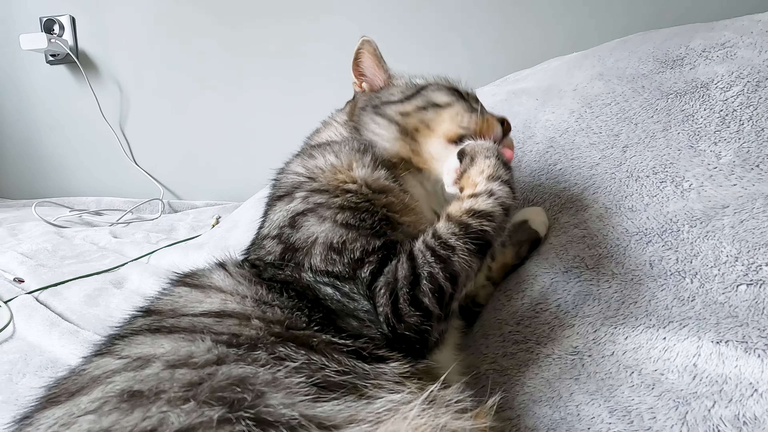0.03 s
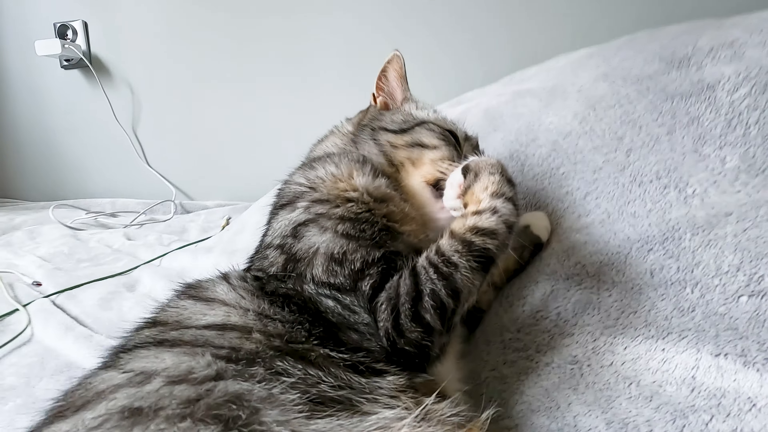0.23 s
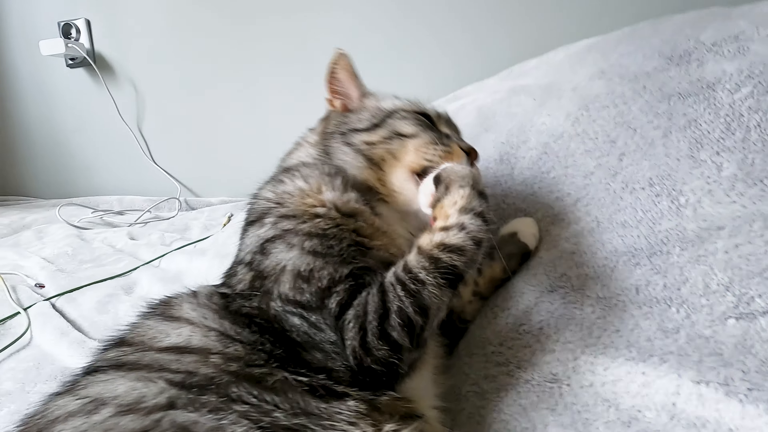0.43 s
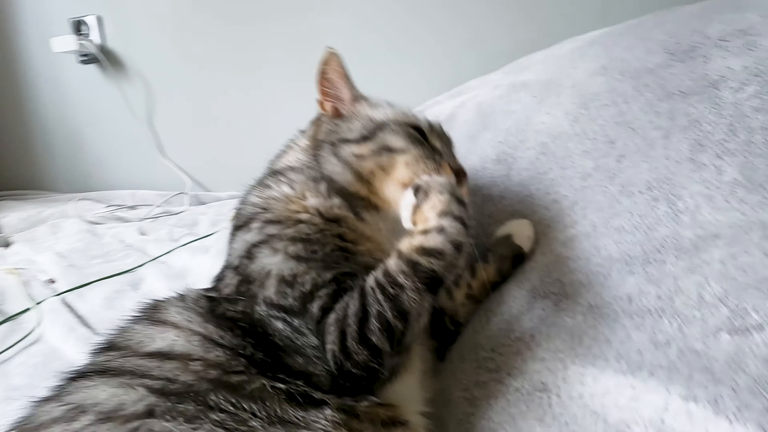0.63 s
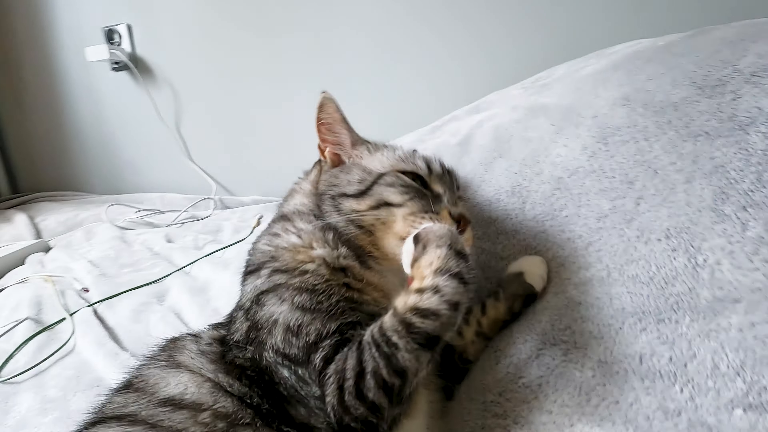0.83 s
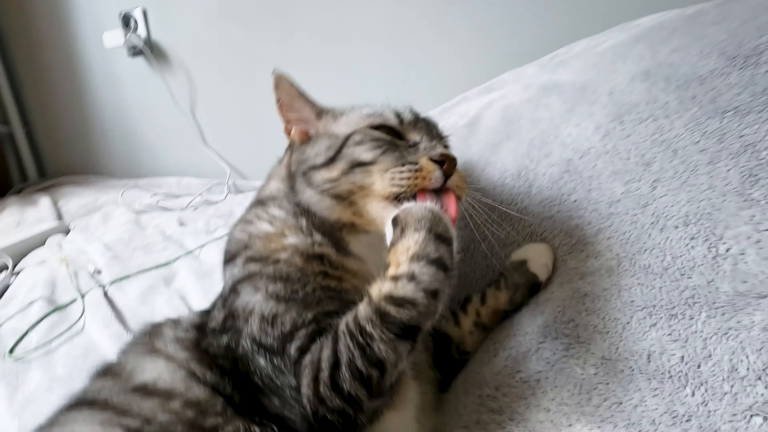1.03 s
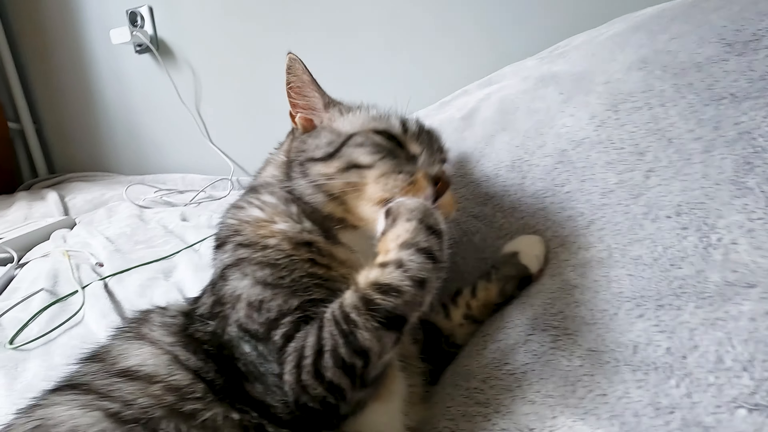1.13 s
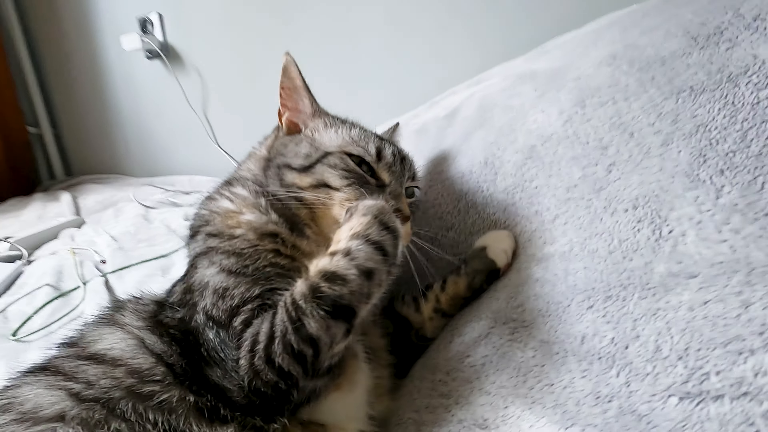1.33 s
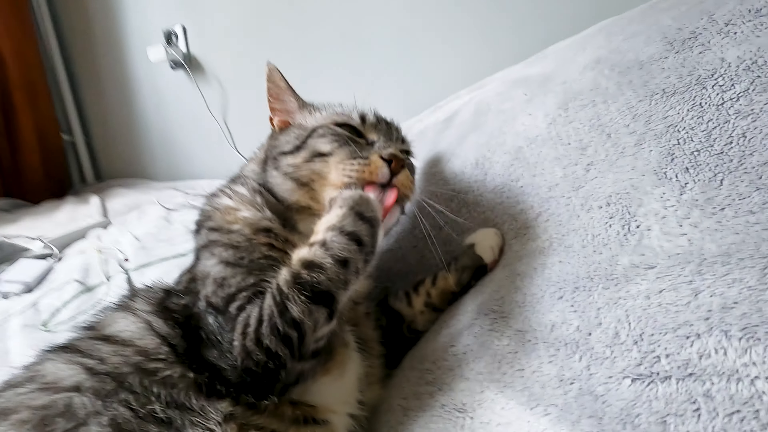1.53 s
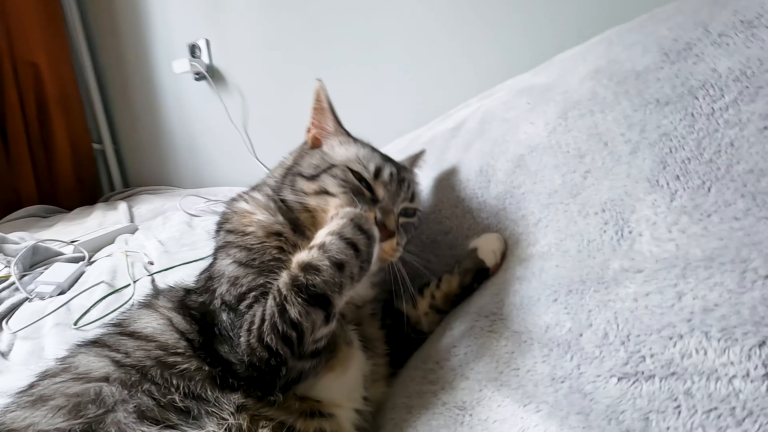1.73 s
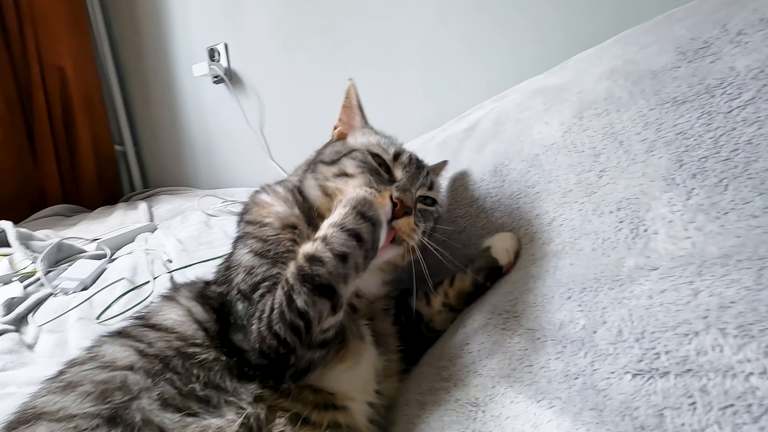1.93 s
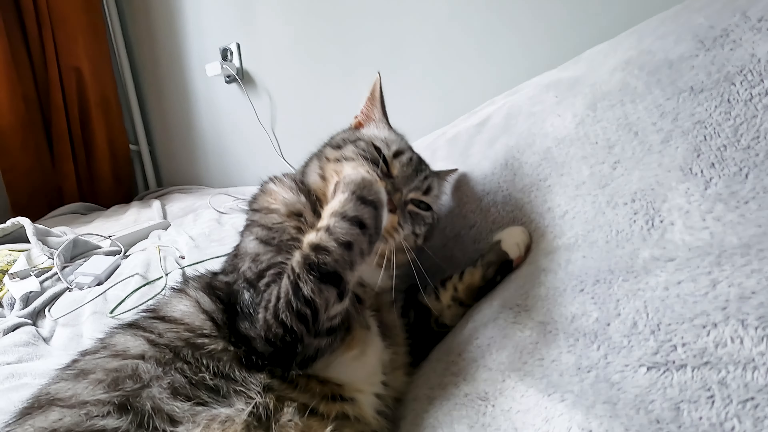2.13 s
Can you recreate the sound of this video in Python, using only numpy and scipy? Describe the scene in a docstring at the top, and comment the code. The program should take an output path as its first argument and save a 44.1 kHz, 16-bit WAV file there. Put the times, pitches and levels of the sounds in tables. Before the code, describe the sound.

A cat licks its paw with soft raspy strokes and small wet smacks.

```python
"""A cat licks its paw and wipes its face, on a bed in a quiet room, close to a hand-held camera.
The barbed tongue rasps over fur about twice a second. Between strokes saliva films snap, tiny
bubbles burst and the mouth cavity squelches; once, suction lets go with a loud pop.
Late on, the paw rubs the muzzle twice. Underneath, the bedding rustles, the moving camera
rumbles and the room hisses faintly."""
import sys
import numpy as np
from scipy import signal
from scipy.fft import rfft, irfft
from scipy.io import wavfile
from scipy.ndimage import uniform_filter1d

SR = 44100
rng = np.random.default_rng(int(sys.argv[2]) if len(sys.argv) > 2 else 0)


def wav_out(sig):
    """Save sig, one row per channel (or a flat mono array), as 16-bit PCM at SR to the path in sys.argv[1]."""
    wavfile.write(sys.argv[1], SR, np.round(np.clip(np.atleast_2d(sig).T, -1, 1) * 32767).astype(np.int16))


N = 97020
T = np.arange(N) / SR
MOUTH_PAN_DB, SPRAY_HZ = -1.5, 9870

# Strokes over fur: peak t/s, rise/s, fall/s, rasp level/dB, rasp f/Hz, skirt re core/dB,
# crackle level/dB, sheen level/dB
STROKES = [(0.055, 0.024, 0.054, -73, 4500, -6, -72, -82.5),
           (0.121, 0.039, 0.051, -61.5, 6300, 3.5, -76.5, -93),
           (0.284, 0.01, 0.019, -78.5, 4420, -9, -101, -101),
           (.542, 0.031, 0.051, -75.5, 7440, 14.5, -75, -88),
           (.685, 0.05, 0.026, -76.5, 6730, -0.5, -84, -84),
           (1.105, 0.038, 0.055, -65, 5920, 9, -69.5, -93),
           (1.168, 0.028, 0.034, -63.5, 6200, -2, -78, -81), (1.687, 0.063, 0.038, -72, 5805, 2, -82, -74),
           (1.903, .041, 0.035, -71.5, 5630, -5, -68.5, -77.5),
           (2.073, .025, .045, -64.5, 5600, -10, -75.5, -95)]
# Hair crackle spectrum: f/Hz, level/dB
CRACKLE_EQ = [(300, -29.5), (900, -16.5), (1800, -13.5), (2700, -7.5), (3500, -8.5), (4400, -7), (5400, -1),
              (7000, 2), (8500, -3.5), (10200, 0), (12200, 0)]

def tongue_strokes():
    """Barbs flick hairs: a narrow rasp, a broad crackle and a sheen of sparse wet specks."""
    out = np.zeros((2, N))
    drag_s = .014
    for peak, rise, fall, db, hz, skirt_db, crackle_db, sheen_db in STROKES:
        barbs = grains(per_s=1400, spread_db=4, share=.7)
        specks = grains(per_s=310, spread_db=4, share=.7)
        core = resonate(noise(width=.6), hz, width_hz=810)
        skirt = amp(skirt_db) * resonate(barbs, hz, width_hz=1870)
        rasp = amp(db) * pan(db=-1) * highpass(core + skirt, .82 * hz)
        sheen = amp(sheen_db) * pan(db=5) * resonate(specks, hz=10920, width_hz=3500)
        crackle = amp(crackle_db) * colour(barbs, CRACKLE_EQ)
        # The tongue catches and slips unevenly.
        drag_db = unit(uniform_filter1d(rng.standard_normal(N), round(drag_s * SR)))
        out += amp(drag_db) * swell(peak, rise, fall) * (rasp + sheen + crackle)
    return out


# Snapping saliva films: t/s, level/dB, cavity f/Hz, build-up/s, spray level/dB, spray f/Hz
SMACKS = [(0.3612, -46, 3420, 0.00079, -52.5, 9990), (0.3631, -38.5, 4100, .00032, -47, 10100),
          (0.3872, -55, 4480, .00067, -58, 9400), (.8541, -35, 2847, .00078, -45.5, 10040),
          (1.394, -32, 2596, 0.0009, -43.5, 9340), (1.6897, -53.5, 5830, 0.00071, -54, 10240)]
# Splatter spectrum: f/Hz, level/dB
SPLATTER_EQ = [(900, -11.5), (1600, -6.5), (4500, -4.5), (6800, -4.5), (8200, 10), (9800, 4.5),
               (12200, 3.5)]

def smacks():
    """Each film chirps upward in two mouth resonances, throws a bright spray and splatters."""
    chirps, splatter_env = np.zeros(N), np.zeros(N)
    oct_per_s, splatter_s = 45, .0023
    for start, db, hz, build, spray_db, spray_hz in SMACKS:
        lower = ring(start, hz, build, oct_per_s)
        upper = amp(-16) * ring(start, 1.7 * hz, build, oct_per_s)
        spray = ring(start + build / 2, spray_hz, build_s=.00057, oct_per_s=oct_per_s)
        chirps += amp(db) * (lower + upper) + amp(spray_db) * spray
        splatter_env += amp(spray_db - 12) * swell(start + build, splatter_s / 2, splatter_s)
    splatter = colour(grains(per_s=9500, spread_db=6, share=.4), SPLATTER_EQ)
    return chirps * pan(MOUTH_PAN_DB) + splatter_env * splatter


# Bursting bubbles: t/s, level/dB, f/Hz
BUBBLES = [(.236, -65.5, 5200), (.273, -58.5, 4490), (0.3376, -59, 1415), (0.3487, -51.5, 5400),
           (.7, -57.5, 10450), (0.814, -58, 1436), (1.0636, -56, 6470), (1.2738, -71, 7950),
           (1.3432, -55.5, 2004), (1.391, -49, 4670), (1.426, -52, 6300), (1.699, -62, 10600),
           (1.732, -57, 10900), (1.8118, -66.5, 8380), (1.851, -64.5, 5600), (2.0555, -55, 5500),
           (2.1753, -58, 2100)]

def bubbles():
    """Tiny bubbles burst on tongue and fur, each ringing briefly."""
    build_cycles = 2.73
    ticks = sum(amp(db) * ring(start, hz, build_cycles / hz) for start, db, hz in BUBBLES)
    return pan(MOUTH_PAN_DB) * ticks


# Mouth opening and closing: peak t/s, rise/s, fall/s, cavity level/dB, cavity f/Hz, fizz level/dB
SQUELCHES = [(0.297, 0.035, 0.022, -79.5, 1200, -89), (0.35, 0.016, 0.025, -63.5, 1274, -72.5),
             (0.384, 0.022, 0.027, -69.5, 1910, -63.5), (.825, 0.022, 0.046, -74, 1403, -100),
             (0.873, 0.023, 0.025, -60, 2420, -64), (1.182, 0.033, 0.022, -76.5, 1900, -102),
             (1.392, 0.038, 0.088, -69.5, 1860, -94), (1.431, 0.031, 0.018, -56.5, 1915, -61),
             (1.502, 0.01, 0.017, -63.5, 1590, -107), (2.11, 0.031, 0.032, -80, 2060, -100)]
# Saliva fizz spectrum: f/Hz, level/dB
FIZZ_EQ = [(1000, -24.5), (2500, -12.5), (3600, 3.5), (5600, 3), (6800, -11), (8200, -5.5), (10000, -8),
           (12200, -6.5)]

def squelches():
    """Saliva fizzes through a mouth cavity whose pitch rises."""
    out = np.zeros((2, N))
    for peak, rise, fall, db, hz, fizz_db in SQUELCHES:
        saliva = grains(per_s=1800, spread_db=3.5, share=.45)
        cavity = amp(db) * resonate(saliva, glide(hz, peak, oct_per_s=.83), width_hz=.43 * hz)
        fizz = amp(fizz_db) * colour(saliva, FIZZ_EQ)
        out += swell(peak, rise, fall) * (cavity + fizz)
    return out


# Lip pop modes: f/Hz, level/dB, build-up/s, left re right/dB
POP_MODES = [(1410, -20.5, 0.0013, -5), (1600, -25, 0.0015, -0.5), (2334, -31, 0.0015, -0.5),
             (3860, -35, 0.00048, 1.5), (605, -42.5, 0.0061, -18.5), (250.6, -42, .009, -5.5),
             (434.7, -35.5, 0.0016, -17), (2860, -38.5, 0.0011, 3)]

def lip_pop(start_s=1.4159):
    """Suction lets go: a bright tick and a hollow pop with a short low ring."""
    body = sum(amp(db) * pan(pan_db) * ring(start_s, hz, build) for hz, db, build, pan_db in POP_MODES)
    tick = amp(-49) * ring(start_s, SPRAY_HZ, build_s=.0001)
    return body + tick


# Paw wipes: peak t/s, rise/s, fall/s, level/dB
WIPES = [(1.724, 0.047, 0.035, -65), (1.91, 0.057, 0.05, -58.5)]
# Rubbing spectrum: f/Hz, level/dB
WIPE_EQ = [(400, -19), (850, -33.5), (1050, -9), (1320, -2), (1700, -15), (2150, -3.5), (2800, -15),
           (3300, -41)]

def paw_wipes():
    """The paw rubs the muzzle with a soft, hollow friction noise."""
    envelope = sum(amp(db) * swell(peak, rise, fall) for peak, rise, fall, db in WIPES)
    return envelope * colour(grains(per_s=830, spread_db=2, share=.11), WIPE_EQ)


# Body shifting on the bedding: peak t/s, rise/s, fall/s, level/dB, f/Hz
RUSTLES = [(0.087, 0.045, 0.053, -68.5, 300), (0.287, 0.02, 0.029, -75.5, 382),
           (0.355, 0.015, 0.043, -53.5, 253.7), (0.462, 0.04, 0.027, -62, 179),
           (0.802, 0.034, 0.032, -62, 306), (.82, 0.11, 0.055, -58.5, 123), (0.959, 0.023, 0.025, -64, 247),
           (1.008, 0.022, 0.047, -60, 116.4), (1.082, 0.0064, 0.024, -69.5, 233),
           (1.371, 0.024, 0.097, -63, 220), (1.481, 0.018, 0.013, -62, 301),
           (1.16, 0.045, 0.034, -65.5, 103.3), (1.892, 0.069, 0.045, -71, 242),
           (2.013, 0.019, 0.042, -61, 240.3), (2.186, 0.033, 0.045, -61.5, 321)]
# Fibre noise spectrum: f/Hz, level/dB
FIBRE_EQ = [(120, -9), (220, 7.5), (400, -3.5), (620, -13), (850, -28), (2000, -23), (9000, -64.5)]

def bedding(brisk_hz=282):
    """The body brushes the blanket, right of centre; duller brushes stir fewer fibres."""
    out = np.zeros((2, N))
    cloth = noise(width=.51)
    fibres = amp(-9) * colour(noise(width=1), FIBRE_EQ)
    for peak, rise, fall, db, hz in RUSTLES:
        brush = resonate(cloth, hz, width_hz=.32 * hz)
        out += amp(db) * swell(peak, rise, fall) * (brush + fibres * (hz / brisk_hz) ** 2)
    return out * pan(db=-6.5)


# Camera and mattress bumps: peak t/s, rise/s, fall/s, level/dB, f/Hz
BUMPS = [(0.193, 0.0034, 0.022, -44, 53.3), (0.274, 0.064, 0.069, -39.5, 22.66),
         (0.346, 0.0087, 0.012, -43, 108.8), (0.554, 0.016, 0.026, -32.5, 31.1),
         (0.68, 0.036, 0.039, -26.5, 32.54), (0.783, 0.066, 0.028, -34.5, 26.7),
         (0.941, 0.019, 0.019, -34.5, 55.4), (1.19, 0.031, 0.01, -45.5, 38.3)]
# Rumble spectrum: f/Hz, level/dB
RUMBLE_EQ = [(8, 1), (20, 6), (35, -8), (60, -11.5), (110, -23.5), (180, -32.5), (400, -60), (2500, -110)]
# Rumble envelope: t/s, level/dB
RUMBLE_LEVEL = [(0, -67.5), (.2, -51.5), (.62, -51.5), (.87, -41), (1.05, -52), (1.3, -56), (1.5, -53),
                (1.9, -52.5), (2.1, -54), (2.2, -45.5)]

def camera_handling():
    """The camera moves over the mattress: soft bumps and a low rumble."""
    bumps = sum(amp(db) * swell(peak, rise, fall) * np.cos(2 * np.pi * hz * (T - peak))
                for peak, rise, fall, db, hz in BUMPS)
    rumble_db = np.interp(T, *np.transpose(RUMBLE_LEVEL))
    return bumps + amp(rumble_db) * colour(noise(width=.51), RUMBLE_EQ)


# Room decay: f/Hz, T60/s
ROOM_T60 = [(200, .25), (600, .17), (1500, .2), (4000, .18), (11000, .15)]

def room_reverb(x, gap_s=.0017):
    """A small soft bedroom: a short tail whose treble dies first."""
    hz, t, spectra = signal.stft(noise(width=.83)[:, :SR // 2], SR, nperseg=256)
    decay = amp(-60 * t / lookup(ROOM_T60, hz)[:, None])
    tail = signal.istft(spectra * decay, SR, nperseg=256)[1]
    tail *= np.clip(T[:tail.shape[1]] / gap_s - 1, 0, 1)
    return signal.fftconvolve(x, tail / np.linalg.norm(tail[0]), axes=1)[:, :N]


# Room tone spectrum: f/Hz, level/dB
ROOM_TONE_EQ = [(30, 19), (150, 9.5), (600, 3), (3000, -7), (6000, -11), (12000, -16)]

def room_tone():
    """Faint, steady, dull hiss."""
    return amp(-84.5) * colour(noise(width=.82), ROOM_TONE_EQ)


def amp(db):
    """Decibels to gain."""
    return 10 ** (np.asarray(db) / 20)


def unit(x):
    """Scales to rms 1."""
    return x / np.sqrt(np.mean(x ** 2) + 1e-20)


def pan(db):
    """Channel gains for a level of left re right."""
    return amp(np.array([[db], [-db]]) / 2)


def lookup(points, hz):
    """Interpolates a table over log frequency."""
    f, value = np.transpose(points)
    return np.interp(np.log(hz + 1), np.log(f), value)


def colour(x, eq):
    """Applies a spectrum; rms 1."""
    gain = amp(lookup(eq, np.fft.rfftfreq(N, 1 / SR)))
    return unit(irfft(rfft(x) * gain, N))


def highpass(x, hz):
    """Steep high-pass; rms 1."""
    return unit(signal.sosfilt(signal.butter(10, hz, "high", fs=SR, output="sos"), x))


def resonate(x, hz, width_hz):
    """Steep resonance with a steady or moving centre; rms 1."""
    carrier = np.exp(2j * np.pi * np.cumsum(hz * np.ones(N)) / SR)
    lowpass = signal.butter(3, np.clip(width_hz / 2, 20, 8000), fs=SR, output="sos")
    return unit((carrier * signal.sosfilt(lowpass, x / carrier)).real)


def noise(width):
    """Stereo white noise; width is side gain over mid gain."""
    mid, side = rng.standard_normal((2, N))
    return unit(np.array([mid + width * side, mid - width * side]))


def grains(per_s, spread_db, share):
    """Uneven clicks in smooth friction noise; share is the clicks' part of the power."""
    size = amp(spread_db * np.minimum(rng.exponential(1, N), 4)) * rng.choice([-1, 1], N)
    clicks = unit(size * (rng.random(N) < per_s / SR))
    return np.sqrt(share) * clicks + np.sqrt(1 - share) * noise(width=.6)


def swell(peak_s, rise_s, fall_s):
    """Bell envelope; rise and fall are its half-widths at half height."""
    distance = abs(T - peak_s) / np.where(T < peak_s, rise_s, fall_s)
    return np.exp(-.7 * distance ** 1.98)


def glide(hz, peak_s, oct_per_s):
    """Pitch sliding through hz at peak_s, held beyond 0.1 s either side."""
    return hz * 2 ** (oct_per_s * np.clip(T - peak_s, -.1, .1))


def ring(start_s, hz, build_s, oct_per_s=0):
    """A small cavity builds up to 1 and dies away; its pitch may slide as it shrinks."""
    age = np.maximum(T - start_s, 0) / build_s
    envelope = (age * np.exp(1 - age)) ** 1.58
    cycles = np.cumsum(glide(hz, start_s + build_s, oct_per_s) * (T > start_s)) / SR
    return envelope * np.sin(2 * np.pi * cycles)


def scene():
    """The cat in its room, over rustle, rumble and hiss."""
    cat = tongue_strokes() + smacks() + bubbles() + squelches() + lip_pop() + paw_wipes()
    return cat + amp(-14.5) * room_reverb(cat) + bedding() + camera_handling() + room_tone()


def record(dry, cutoff_hz=12250):
    """The recorder's band limit."""
    lowpass = signal.firwin(255, cutoff_hz, window=("kaiser", 8), fs=SR)
    return signal.oaconvolve(dry, lowpass[None], "same")


dry = scene()
out = record(dry)
wav_out(out)
```